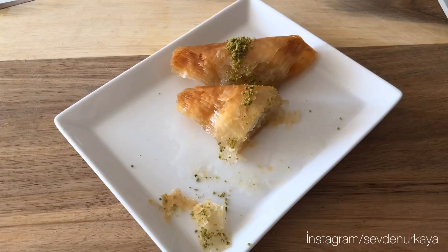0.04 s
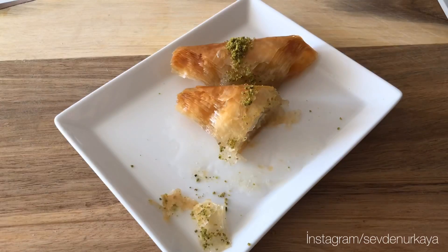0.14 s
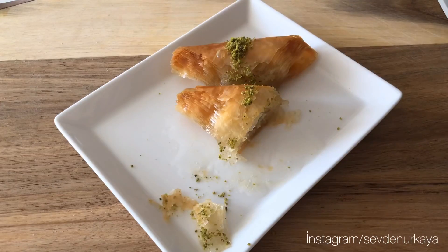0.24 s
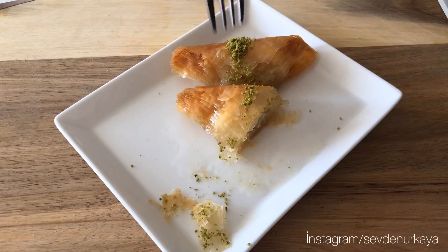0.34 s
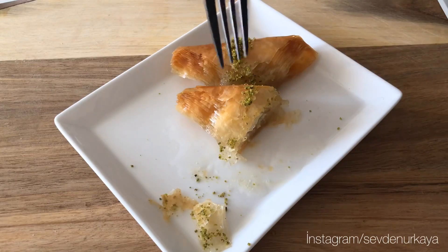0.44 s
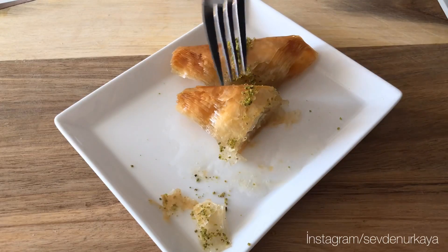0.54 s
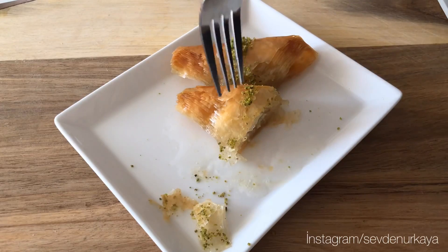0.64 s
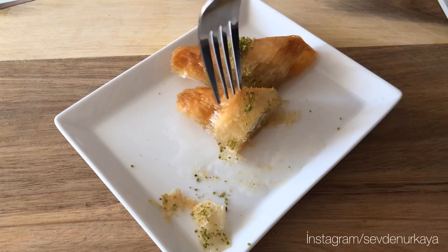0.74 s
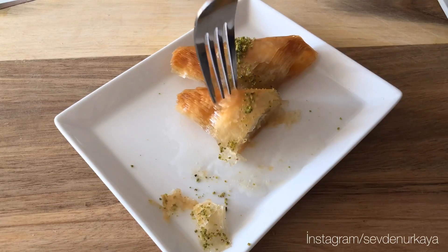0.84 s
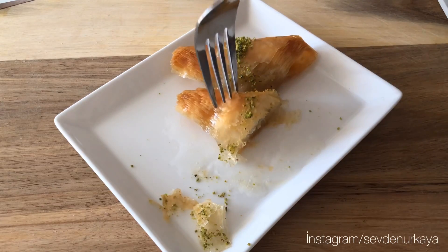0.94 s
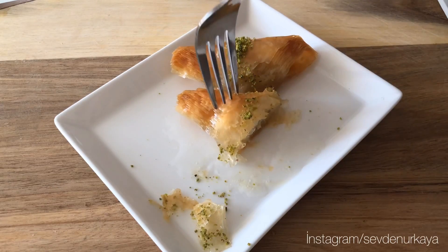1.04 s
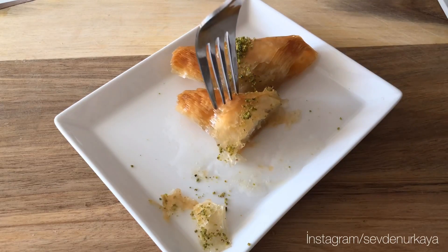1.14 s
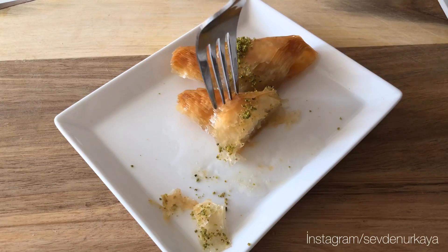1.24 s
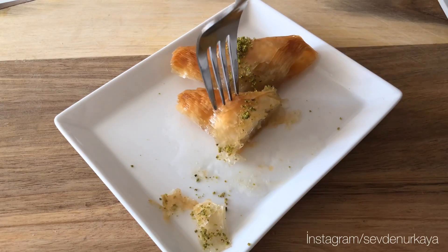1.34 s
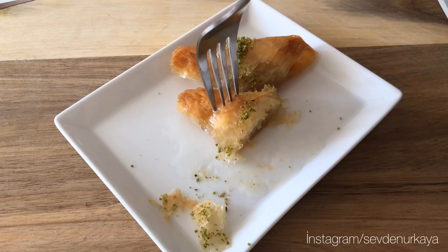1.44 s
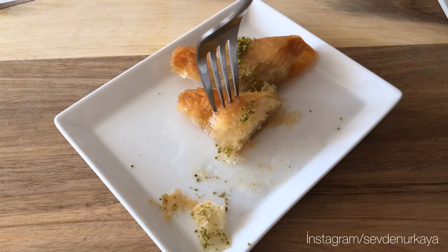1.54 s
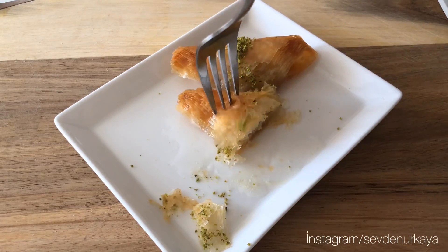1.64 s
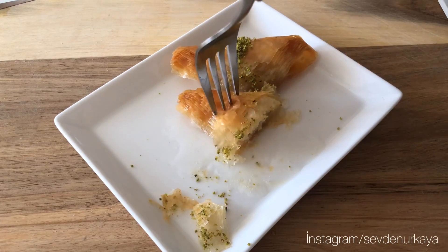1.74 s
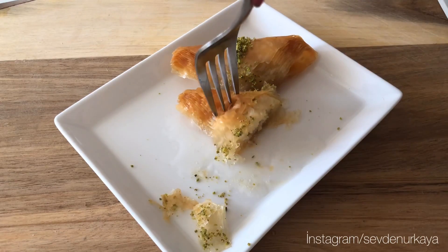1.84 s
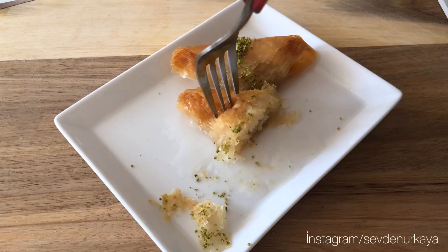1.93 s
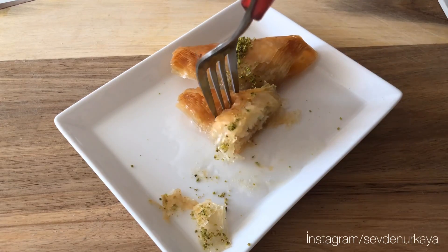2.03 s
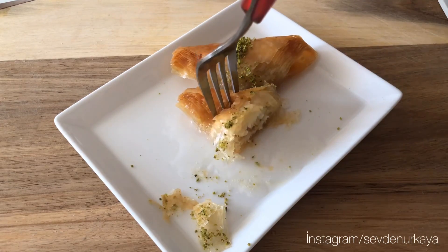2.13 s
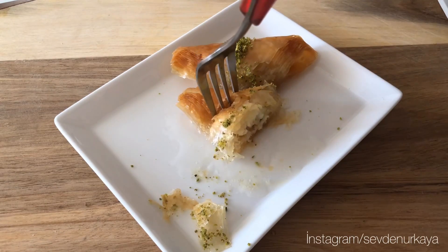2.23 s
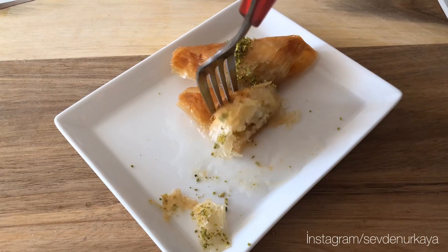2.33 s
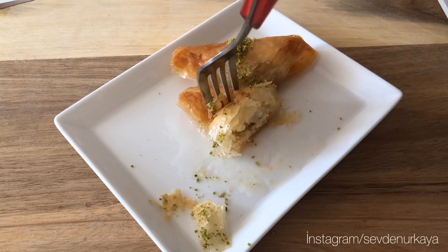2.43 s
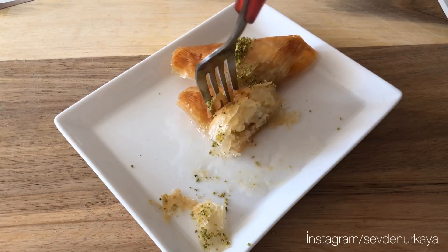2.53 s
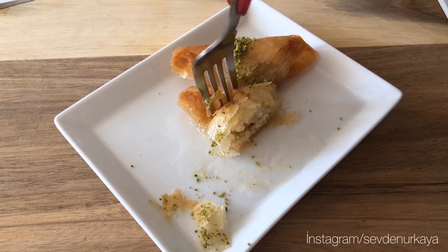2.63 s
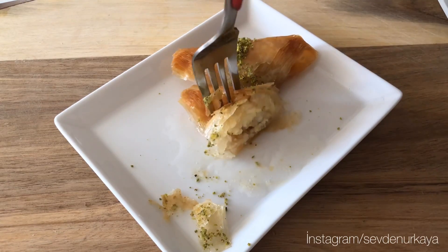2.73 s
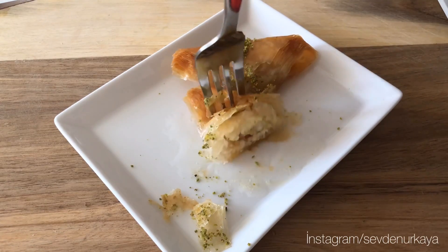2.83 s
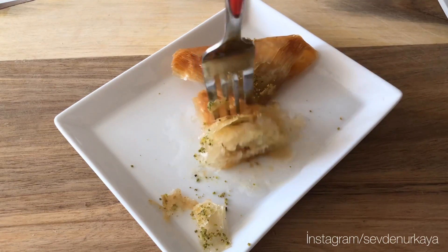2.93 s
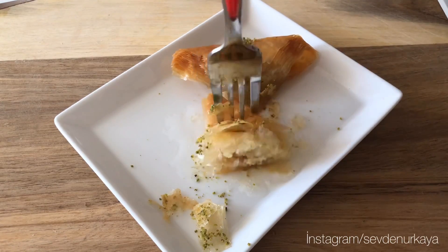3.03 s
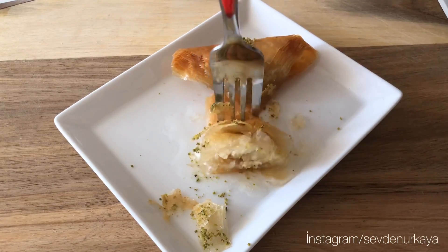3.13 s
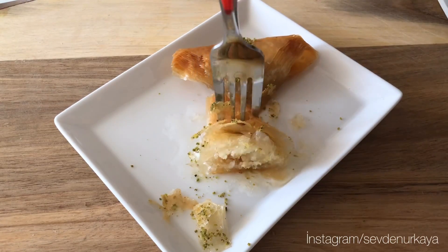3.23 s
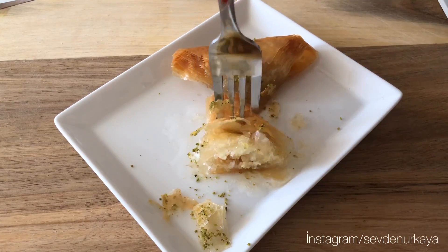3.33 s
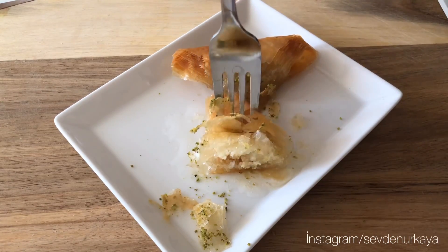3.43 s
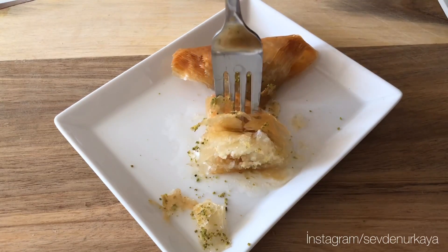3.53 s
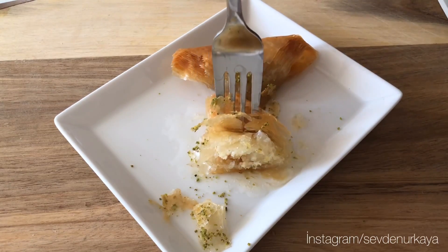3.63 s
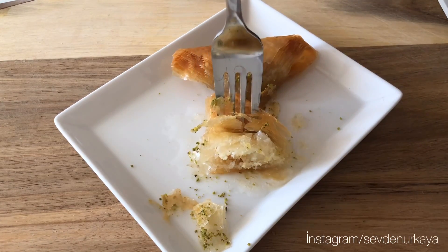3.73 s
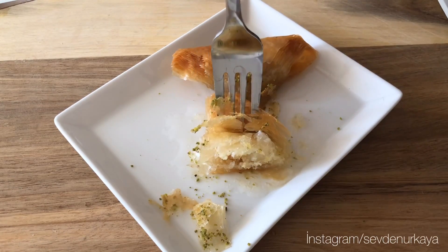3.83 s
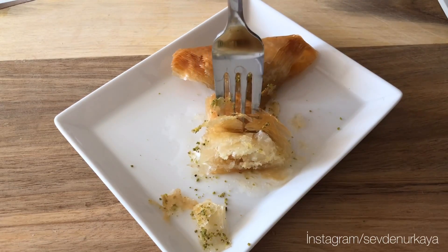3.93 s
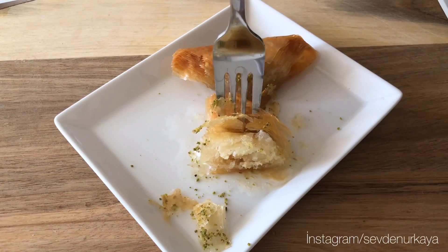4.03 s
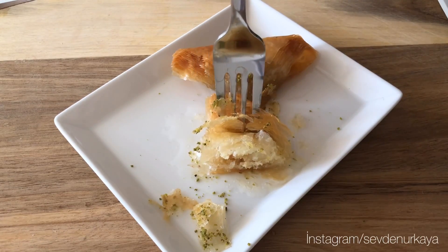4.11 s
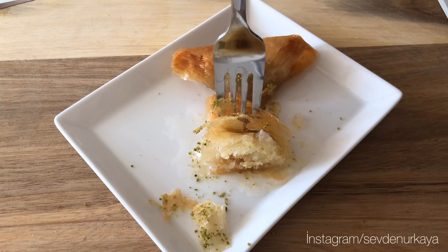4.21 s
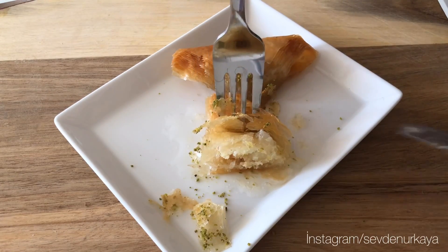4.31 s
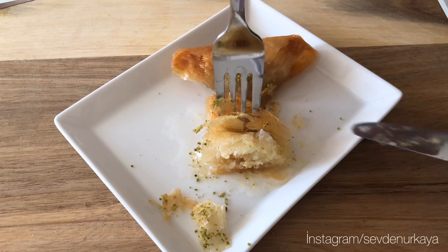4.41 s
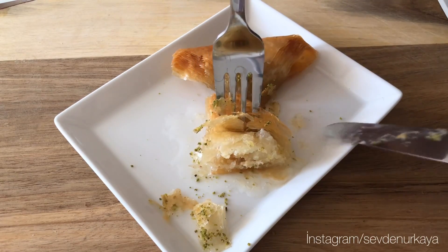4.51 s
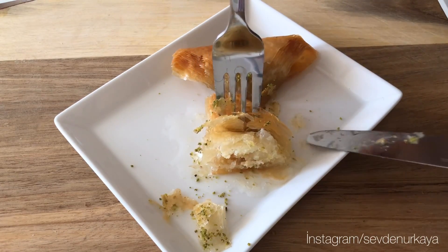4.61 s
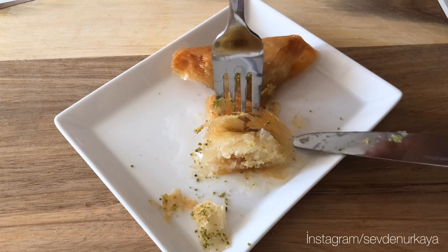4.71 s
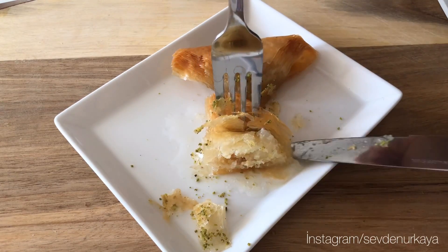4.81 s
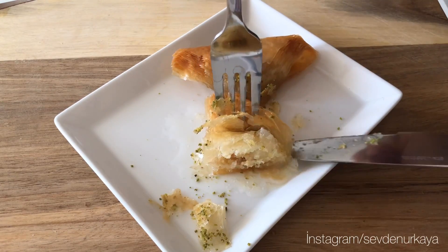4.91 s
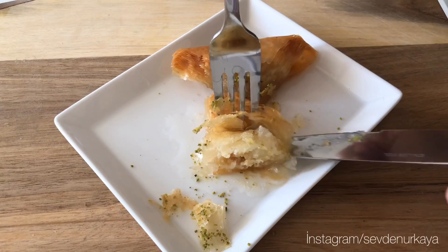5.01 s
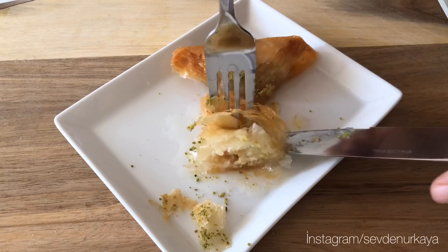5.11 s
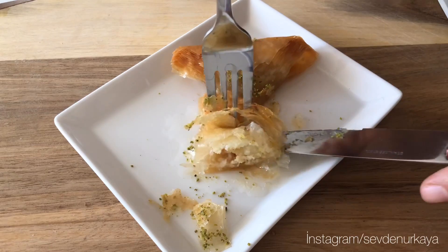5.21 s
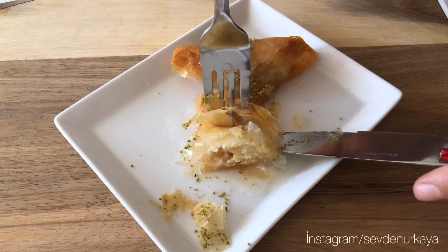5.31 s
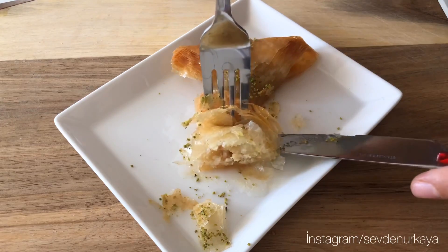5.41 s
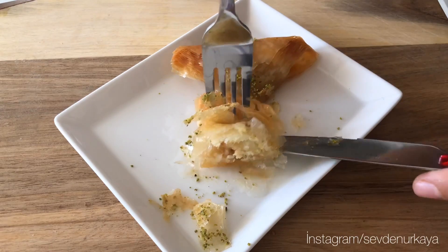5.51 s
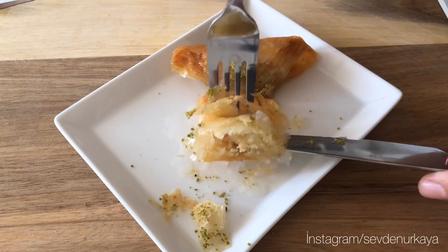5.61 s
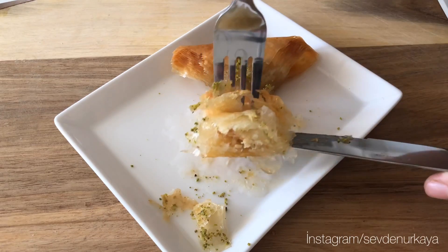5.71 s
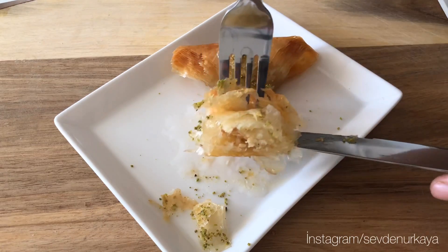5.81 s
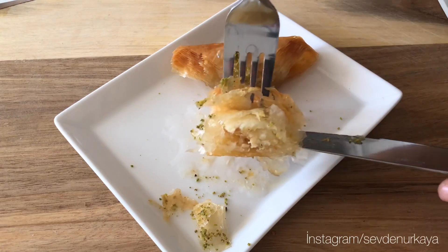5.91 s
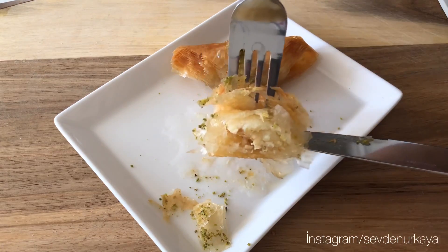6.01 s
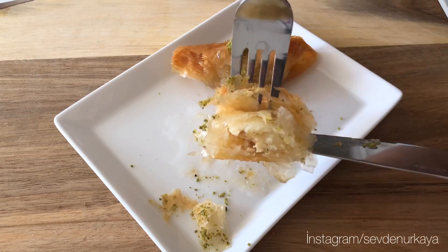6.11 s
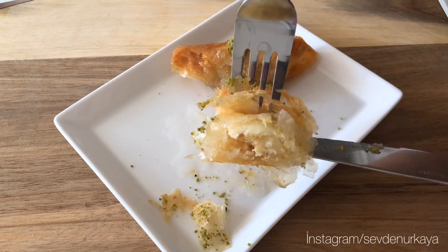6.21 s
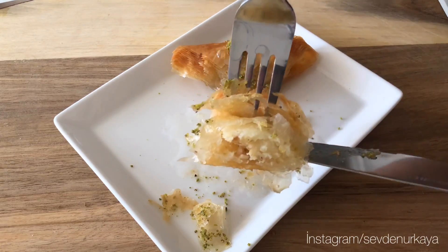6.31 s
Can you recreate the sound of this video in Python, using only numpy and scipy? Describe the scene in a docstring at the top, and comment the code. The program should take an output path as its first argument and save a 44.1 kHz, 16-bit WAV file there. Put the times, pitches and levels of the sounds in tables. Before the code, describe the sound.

Flaky pastry breaks under a fork, heard up close: scattered high snaps first, then a longer, louder crunch that eases off as the fork reaches the plate. The plate knocks gently on a wooden board and the pastry gives another sharp crack. Later a knife strikes the ceramic with one bright clink, followed by light scraping and tiny syrupy ticks. A low appliance hum sits behind it in a small, slightly echoing room.

```python
"""A fork cuts crisp pastry

Close by, a fork presses through layered pastry on a ceramic plate. Thin sheets snap one by one
over chips and a fine crackle that follow the push, while the soft filling squashes underneath.
The fork reaches the plate, which bumps its wooden board, then spears the piece. A knife clinks
and slides under it, and the syrup peels away. A small room echoes and an appliance hums."""
import sys
import numpy as np
from scipy import signal
from scipy.fft import rfft, irfft, next_fast_len
from scipy.io import wavfile
from scipy.ndimage import map_coordinates

SR = 44100
rng = np.random.default_rng(int(sys.argv[2]) if len(sys.argv) > 2 else 0)


def file_out(sig):
    """Save sig as 16-bit WAV at sys.argv[1]."""
    # one column per channel
    cols = np.atleast_2d(sig).T
    # limit, then scale
    lim = np.clip(cols, -1, 1)
    pcm = np.round(lim * 32767).astype(np.int16)
    wavfile.write(sys.argv[1], SR, pcm)


N = 280108
TIME_S = np.arange(N) / SR
TOP_HZ = 10400  # the treble ends here


def amp(db):
    """Turn decibels into a number to multiply by."""
    return 10 ** (np.asarray(db) / 20)


def unit(x):
    """Scale a sound so its average level (rms) is 1."""
    return x / np.sqrt(np.mean(x ** 2) + 1e-20)


def curve_at(points, hz):
    """Read between (pitch_hz, value) points, with octaves evenly spaced."""
    pitches, values = np.transpose(points)
    return np.interp(np.log(hz + 1), np.log(pitches + 1), values)


def wobble(per_s):
    """A smooth curve through per_s random values each second."""
    values = rng.standard_normal(int(N * per_s / SR) + 4)
    return map_coordinates(values, [TIME_S * per_s])


def filtered(x, gain_at):
    """Turn each frequency of a sound up or down by gain_at(hz)."""
    size = next_fast_len(N + SR // 2)
    return irfft(rfft(x, size) * gain_at(np.fft.rfftfreq(size, 1 / SR)), size)[:N]


def noise(tone):
    """Noise shaped by (pitch_hz, level_db) points, at an average level of 1."""
    return unit(filtered(rng.standard_normal(N), lambda hz: amp(curve_at(tone, hz))))


def placed(starts_s, sounds):
    """Add up short sounds, one a row, each at its start time."""
    index = np.round(np.asarray(starts_s) * SR).astype(int)[:, None] + np.arange(sounds.shape[1])
    return np.bincount(np.clip(index, 0, N).ravel(), sounds.ravel(), N + 1)[:N]


# The tones of an appliance: pitch_hz, level_db
HUM_TONES = [(66.6, -55), (125, -86.5), (156, -79.5), (1330, -79.5), (1529, -84.5), (1599, -85.5),
             (4522, -91), (6121, -91)]

def appliance_hum():
    """An appliance hums with a few slightly unsteady tones."""
    hum = np.zeros(N)
    for hz, db in HUM_TONES:
        waver = min(hz / 600, 1.5) * wobble(7)
        hum += amp(db) * np.sqrt(2) * np.sin(2 * np.pi * hz * TIME_S + waver)
    return hum


# The tone of the room's own noise: pitch_hz, relative_db
ROOM_NOISE_TONE = [(53, -44), (90, -1), (101, -11), (145, 0.5), (208, -7.5), (234, -11), (393, -10),
                   (562, -17), (1020, -19.5), (1130, -20.5), (1550, -23), (2090, -29.5), (6260, -33),
                   (9700, -34), (10500, -64.5), (13600, -100), (22000, -120)]

def room_noise():
    """A faint, low rush whose level wavers a little."""
    air = unit(filtered(noise(ROOM_NOISE_TONE), lambda hz: hz > 45))
    return amp(-61.5 + .5 * wobble(3.68)) * air


# Short presses of fork or knife on the pastry: start_s, length_s, push_db
SHORT_PRESSES = [(0.829, 0.037, -57), (0.942, 0.062, -60.5), (1.156, .03, -49), (1.241, 0.0037, -57),
                 (1.389, 0.037, -48), (1.512, 0.081, -49), (2.662, 0.025, -52.5), (2.839, .02, -56),
                 (2.955, 0.1, -56), (3.094, 0.097, -60), (3.293, 0.013, -62.5), (3.39, .06, -58.5),
                 (3.485, 0.054, -45), (4.057, 0.13, -66.5), (4.506, 0.043, -61.5), (4.938, 0.072, -61),
                 (5.074, .05, -58), (5.23, 0.02, -61), (5.35, 0.16, -67), (5.572, 0.082, -59)]
# The long cut down through all the layers: time_s, push_db
LONG_CUT = [(1.605, -54.5), (1.629, -33), (1.672, -32.5), (1.735, -48), (1.82, -42.5), (1.99, -34),
            (2.1, -39), (2.17, -51), (2.28, -44), (2.42, -43.5), (2.49, -55), (2.6, -64)]
RESTING_DB, FIRM_DB = -75, -34  # the push of a resting fork and of a firm press

def push(t, rise_db_per_s=520.5, fall_db_per_s=164.5):
    """How hard the pastry is crushed at times t, in dB: each push builds fast and eases slowly."""
    def fade_db(begin, end):
        return rise_db_per_s * np.maximum(begin - t, 0) + fall_db_per_s * np.maximum(t - end, 0)

    start_s, length_s, press_db = np.transpose(SHORT_PRESSES)[:, :, None]
    presses = np.max(press_db - fade_db(start_s, start_s + length_s), axis=0)
    cut_s, cut_db = np.transpose(LONG_CUT)
    cut = np.interp(t, cut_s, cut_db) - fade_db(cut_s[0], cut_s[-1])
    resting = RESTING_DB - fade_db(start_s.min(), N / SR)
    return np.max([presses, cut, resting], axis=0)


# The tone of breaking pastry: pitch_hz, relative_db
PASTRY_TONE = [(100, -34), (400, -24.5), (900, -27), (1700, -19), (2600, -16), (3350, -13), (3700, -4.5),
               (5500, -3), (6600, -1.5), (8200, -2), (9500, -1), (11000, -17.5)]

def pastry_breaks(times, level_db, pitch_hz, body_db, flutter_db, flutter_s, ring_db, rise_s=.0002):
    """Each break is a tiny burst; the freed flake flutters and rings broadly around its pitch."""
    size, lead = 512, 64  # samples in each break, and before its burst
    t = np.maximum(np.arange(size) - lead, 0) / SR
    burst = (t / rise_s) ** 2 * np.exp(2 - 2 * t / rise_s)
    flutter = amp(flutter_db - 60 * t / flutter_s) * (t > rise_s)
    spectrum = rfft(rng.standard_normal((len(times), size)) * (burst + flutter))
    spectrum /= np.cbrt(np.abs(spectrum) + 1e-9)  # a sudden break spreads its energy fairly evenly
    hz = np.fft.rfftfreq(size, 1 / SR) + 1
    flake_db = ring_db * np.exp(-(np.log2(hz / pitch_hz[:, None]) / 0.38) ** 2)
    thick_db = body_db[:, None] * np.exp(-(np.log2(hz / 3100) / 0.75) ** 2)  # thicker sounds fuller
    tone = amp(curve_at(PASTRY_TONE, hz) + flake_db + thick_db) / (1 + (hz / TOP_HZ) ** 40)
    cracks = irfft(spectrum * tone, size)
    strength = np.linalg.norm(cracks, axis=1) / np.sqrt(.002 * SR)  # level if packed into 2 ms
    return placed(times - rise_s - lead / SR, cracks * (amp(level_db) / strength)[:, None])


def crackle(count=2300):
    """Countless small flakes break under the steel and merge into a rustle that follows the push."""
    times = rng.uniform(0, N / SR, count)
    size, spread, thickness = rng.standard_normal((count, 3)).T
    flakes = pastry_breaks(times, level_db=6 * np.clip(size, -3, 1.6),
                           pitch_hz=7000 * np.exp(0.17 * spread), body_db=6.7 + 3 * thickness,
                           flutter_db=-13, flutter_s=.01, ring_db=6.5)
    rustle = amp(-3) * unit(flakes) + amp(-9.5) * noise(PASTRY_TONE)
    return amp(push(TIME_S)) * rustle


def chips(chances=800, resting_per_s=16, firm_per_s=120):
    """Medium flakes break at random: a harder push makes more of them, louder and fuller."""
    offset, luck, size = rng.uniform(size=(chances, 3)).T
    spread, thickness = rng.standard_normal((chances, 2)).T
    step_s = N / SR / chances
    times = (np.arange(chances) + offset) * step_s
    push_db = np.minimum(push(times), FIRM_DB)
    breaks = luck < step_s * np.interp(push_db, [RESTING_DB, FIRM_DB], [resting_per_s, firm_per_s])
    below_firm_db = FIRM_DB - push_db
    level_db = -32.5 - 0.77 * below_firm_db + 10 * (size - .5)
    pitch_hz = 6700 * np.exp(0.27 * spread)
    body_db = 4 - 0.14 * below_firm_db + 5 * thickness
    return pastry_breaks(times[breaks], level_db[breaks], pitch_hz[breaks], body_db[breaks],
                         flutter_db=-12, flutter_s=.009, ring_db=14.5)


# The tone of soft filling being squashed: pitch_hz, relative_db
FILLING_TONE = [(120, -17.5), (300, -2.5), (520, 2.5), (720, -8), (1000, -7), (2000, -0.5), (3200, -6.5),
                (6000, -42)]

def filling():
    """Under the crust, nuts and syrup are squashed with a dull, lumpy crunch."""
    lumps = amp(4.3 * wobble(120))
    return amp(push(TIME_S) - 19.5) * unit(lumps * noise(FILLING_TONE))


# Steel sliding over pastry and glaze: middle_s, length_s, relative_db, pitch_hz, width_octaves
STEEL_SLIDES = [(0.827, 0.07, -57.5, 4830, 0.95), (0.882, 0.046, -50, 3000, 1.7),
                (2.772, 0.06, -56, 1800, 2), (2.846, .08, -63, 3750, 0.38), (2.956, 0.11, -58, 3780, 0.14),
                (4.878, 0.07, -58.5, 1490, 1.28), (5.206, 0.086, -57.5, 1323, 2),
                (5.285, 0.17, -64.5, 1340, 0.42), (5.599, 0.14, -64, 1600, 1.3),
                (5.921, 0.08, -67.5, 1196, 0.41), (6.269, 0.091, -67, 2280, 0.4)]

def steel_slides():
    """Each short slide swells and fades, grainy from sticking and slipping."""
    slides = np.zeros(N)
    for middle_s, length_s, db, pitch_hz, width in STEEL_SLIDES:
        swell = np.cos(np.pi * np.clip((TIME_S - middle_s) / length_s, -.5, .5))
        band = lambda hz: np.exp(-(np.log2((hz + 1) / pitch_hz) / width) ** 2 / 2)
        friction = unit(filtered(rng.standard_normal(N), band))
        slides += swell * amp(db - 3.5 + 3.2 * wobble(250)) * friction
    return slides


# Large pastry sheets snapping (more body sounds fuller): start_s, peak_db, pitch_hz, body_db
SHEET_SNAPS = [(1.037, -24.5, 9100, -20), (1.059, -30, 6860, -33), (1.0774, -23.5, 7400, -26),
               (1.1028, -14.5, 7100, -30.5), (1.161, -22.5, 5600, -33), (1.1892, -23.5, 6930, -32),
               (1.345, -25, 6300, -20), (1.3691, -22.5, 9080, -29), (1.3754, -22.5, 6710, -23),
               (1.3987, -21.5, 6600, -28), (1.409, -21, 9300, -28), (1.4183, -19, 8890, -28),
               (1.4228, -16, 9400, -22.5), (1.4651, -19.5, 5300, -40), (1.4753, -23, 4680, -31.5),
               (1.506, -21, 9220, -30), (1.5204, -13, 7070, -32), (1.5276, -14, 9300, -37),
               (1.5597, -15, 7800, -38), (1.6252, -15.5, 9100, -21.5), (1.6402, -9, 9460, -40),
               (1.6611, -8.5, 7770, -24.5), (1.6675, -7, 8890, -29), (1.6713, -10, 9530, -28),
               (1.6782, -26, 9330, -23), (1.715, -17, 9000, -33), (1.7599, -21, 8880, -26),
               (1.7841, -16, 9200, -35.5), (1.7948, -21, 9300, -22.5), (1.8268, -21, 9140, -28),
               (1.8503, -14, 8220, -21), (1.8805, -16, 9260, -23), (1.9495, -14.5, 9240, -28),
               (1.97, -16.5, 9380, -33), (1.9983, -9.5, 9150, -41.5), (2.0243, -7, 6700, -40),
               (2.0763, -14, 4470, -38), (2.1542, -18.5, 6930, -24.5), (2.171, -16.5, 6700, -24.5),
               (2.2268, -16, 7450, -28), (2.2385, -16, 6630, -31), (2.2756, -11, 6300, -22.5),
               (2.3074, -15.5, 7080, -26), (2.3438, -19.5, 7220, -30), (2.4267, -11, 3560, -36),
               (2.4527, -19, 7570, -27), (2.5728, -26.5, 6860, -16), (2.678, -21, 6440, -20.5),
               (3.0041, -21.5, 6650, -33), (3.0216, -26, 7450, -26), (3.138, -11, 7700, -35),
               (3.376, -14, 7050, -33.5), (3.4213, -26, 7770, -40.5), (3.4456, -27, 5450, -29),
               (3.459, -14, 6600, -33.5), (3.462, -13.5, 5680, -28), (3.4801, -3, 7200, -43),
               (3.4826, -14.5, 8870, -42.5), (4.353, -35, 7140, -25.5), (4.4342, -27.5, 7420, -25),
               (4.4923, -18, 7080, -31), (4.8573, -22, 7000, -32.5), (4.9548, -26, 5690, -34),
               (4.9844, -27.5, 5900, -24), (4.9953, -23, 5960, -41), (5.4147, -31, 7360, -36),
               (5.5854, -28, 5900, -28)]

def sheet_snaps(time_to_peak_s=.0012, peak_over_average_db=11, thin_sheet_body_db=-32.5):
    """The larger sheets give way one at a time."""
    start_s, peak_db, pitch_hz, body_db = np.transpose(SHEET_SNAPS)
    return pastry_breaks(start_s + time_to_peak_s, peak_db - peak_over_average_db, pitch_hz,
                         body_db - thin_sheet_body_db, flutter_db=-11, flutter_s=0.012, ring_db=9.5)


# The plate ringing under the fork: pitch_hz, relative_db, ring_s (time to fade by 60 dB)
PLATE_TONES = [(335, 0, .04), (575, 3, .04), (935, 1, .05), (1135, 0, .04), (1326, -2, .16),
               (2112, -12.5, .28), (3350, -9, .08), (3916, -2, .06), (4855, -6, .08)]

def plate_grind(start_s=1.65, end_s=2.44):
    """As the fork nears the plate, the last layers grind on it and set it ringing."""
    def plate_response(hz):
        return sum(amp(db) / (1 + 1j * (hz - pitch_hz) * ring_s * np.pi / np.log(1000))
                   for pitch_hz, db, ring_s in PLATE_TONES)

    pressure = np.interp(TIME_S, [start_s, end_s - .02, end_s], [0, 1, 0]) * amp(4.6 * wobble(40))
    return amp(-75) * unit(filtered(pressure * rng.standard_normal(N), plate_response))


def struck(hits, tones, build_cycles, chatter_db, chatter_s):
    """Hits make an object ring, its low tones building slowest; the contact chatters briefly."""
    t = np.arange(SR // 2) / SR
    hz, tone_db, ring_s = np.transpose(tones)[:, :, None]
    build = 1 - np.exp(-t * hz / build_cycles)
    bass_cut = signal.butter(2, 450, "highpass", fs=SR, output="sos")  # a small contact has little bass
    sounds = []
    for _, hit_db in hits:
        strength_db = tone_db + rng.normal(0, 1, hz.shape)
        fade = amp(strength_db - 60 * t / ring_s)
        # the shifting contact blurs the ring, most of all in the high tones
        blur = 0.02 * np.sqrt(hz / 1000) * np.cumsum(rng.standard_normal(build.shape), axis=1)
        phase = rng.uniform(0, 2 * np.pi, hz.shape) + blur
        ring = np.sum(build * fade * np.sin(2 * np.pi * hz * t + phase), axis=0)
        chatter = amp(chatter_db) / (1 + (t / chatter_s) ** 6) * rng.standard_normal(len(t))
        sounds.append(amp(hit_db) * (ring + signal.sosfilt(bass_cut, chatter)))
    return placed([start_s for start_s, _ in hits], np.array(sounds))


# The fork reaching the plate: start_s, relative_db
FORK_HITS = [(2.418, -46), (2.4275, -45.5), (2.4385, -53.5)]

def fork_taps():
    """The fork lands softly on the plate, cushioned by syrup."""
    return amp(1.5) * struck(FORK_HITS, PLATE_TONES, build_cycles=1.5, chatter_db=3, chatter_s=.004)


# The plate nudged against the wooden board: start_s, relative_db
BOARD_BUMPS = [(2.428, -44), (3.034, -49), (3.1, -48), (3.174, -49)]
# The tones of the plate's knock and of the board's thud: pitch_hz, relative_db, ring_s
KNOCK_TONES = [(290, -6.5, 0.059), (394, -2.5, 0.026), (500, -7.5, 0.057)]
THUD_TONES = [(85, 0, 0.096), (118.1, -1.1, 0.077)]

def board_bumps(thud_delay_s=0.022):
    """Pressure on the plate knocks it against the board, which settles with a soft thud."""
    knock = struck(BOARD_BUMPS, KNOCK_TONES, build_cycles=0.9, chatter_db=-28, chatter_s=.004)
    settling = [(start_s + thud_delay_s, db) for start_s, db in BOARD_BUMPS]
    thud = struck(settling, THUD_TONES, build_cycles=.5, chatter_db=-34.5, chatter_s=0.0031)
    return amp(5) * knock + amp(6) * thud


# The knife striking the plate: start_s, relative_db
KNIFE_HITS = [(4.718, -27.5)]
# Knife and plate ringing together: pitch_hz, relative_db, ring_s
KNIFE_TONES = [(481, 14.5, 0.015), (950, 6.5, 0.017), (1590, 6, 0.012), (1750, 2.5, 0.018),
               (2030, -19, 0.14), (2440, -22, 0.47), (3100, -3.5, 0.035), (4015, -1, 0.019),
               (4080, -26, 0.35), (5030, -18.5, 0.037), (5760, 1, 0.031), (6000, -27, 0.14),
               (6500, -2.5, 0.034), (8180, 8, 0.024), (8250, -21, 0.34), (9200, -19, 0.055),
               (9330, -18.5, 0.05)]

def knife_clink():
    """The knife strikes the plate and chatters on the glaze."""
    return amp(-3.5) * struck(KNIFE_HITS, KNIFE_TONES, build_cycles=2, chatter_db=1, chatter_s=.005)


def syrup_peel(start_s=5.35, length_s=0.19, count=13):
    """As the piece lifts, syrup lets go of the plate in a short run of thin, high ticks."""
    offset, softness, spread = rng.uniform(size=(count, 3)).T
    times = start_s + length_s * (np.arange(count) + offset) / count
    return pastry_breaks(times, level_db=-46 - 7 * softness,
                         pitch_hz=7300 * np.exp(.2 * (spread - .5)), body_db=np.full(count, -7),
                         flutter_db=-11.5, flutter_s=0.0096, ring_db=19, rise_s=0.00024)


# How long the room's echo takes to fade by 60 dB: pitch_hz, ring_s
ECHO_TIMES = [(200, .35), (2000, 0.8), (6000, 0.37), (10000, 0.18)]

def room_echo(sound, tail_db, wall_db, wall_delay_s):
    """A near wall throws the sound back once, and the rest of the room adds a faint tail."""
    hz, t, spectrum = signal.stft(rng.standard_normal(SR // 2), SR, nperseg=256)
    fade = amp(-60 * t / curve_at(ECHO_TIMES, hz)[:, None])
    tail = signal.istft(spectrum * fade, SR, nperseg=256)[1]
    echo = amp(tail_db) * tail / np.linalg.norm(tail)
    echo[round(wall_delay_s * SR)] += amp(wall_db)
    return signal.fftconvolve(sound, echo)[:N]


def scene():
    """Mix the pastry, the plate, their echoes and the room's background into one channel."""
    pastry = sheet_snaps() + chips() + crackle() + syrup_peel() + filling() + steel_slides()
    plate = knife_clink() + fork_taps() + plate_grind() + board_bumps()
    pastry_echo = room_echo(pastry, tail_db=-17.5, wall_db=-23.5, wall_delay_s=.0115)
    plate_echo = room_echo(plate, tail_db=-13, wall_db=-17, wall_delay_s=0.016)
    return (pastry + plate + pastry_echo + plate_echo + appliance_hum() + room_noise())[None]


def record(dry):
    """Cut away the treble above TOP_HZ."""
    return filtered(dry[0], lambda hz: 1 / np.sqrt(1 + (hz / TOP_HZ) ** 120))[None]


dry = scene()
out = record(dry)
file_out(out)
```